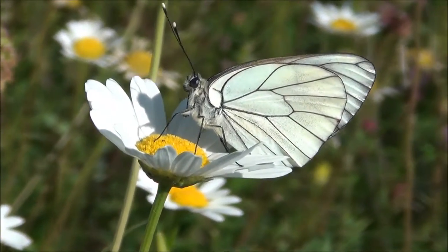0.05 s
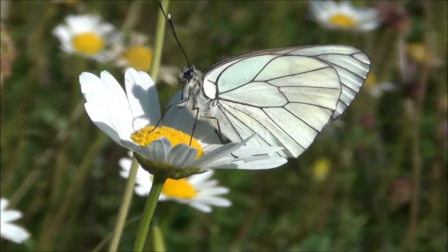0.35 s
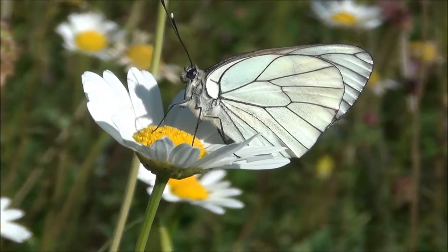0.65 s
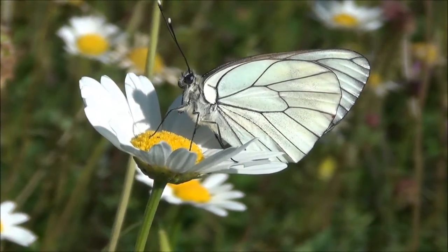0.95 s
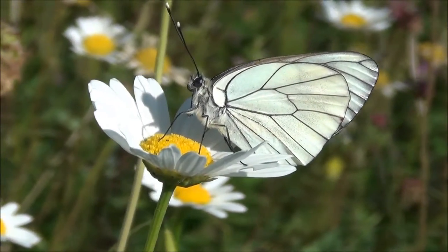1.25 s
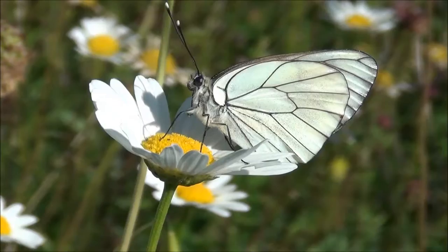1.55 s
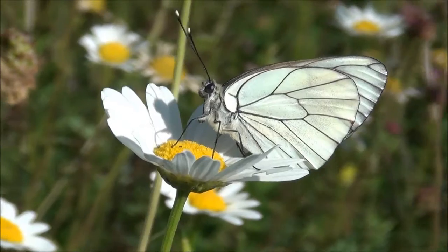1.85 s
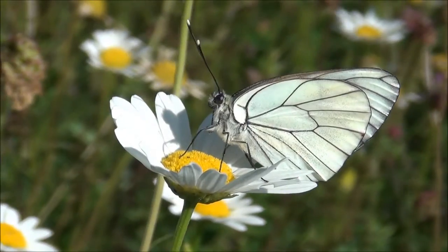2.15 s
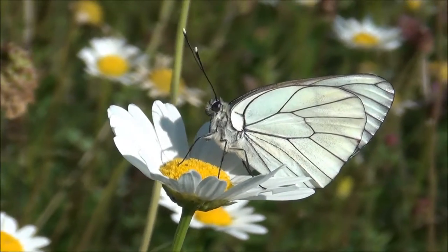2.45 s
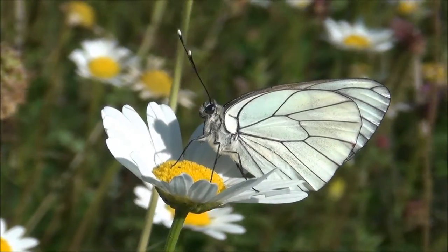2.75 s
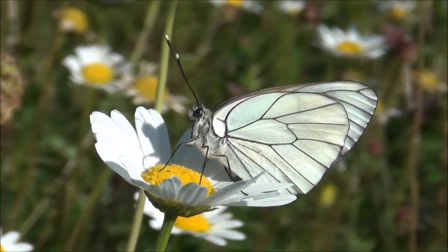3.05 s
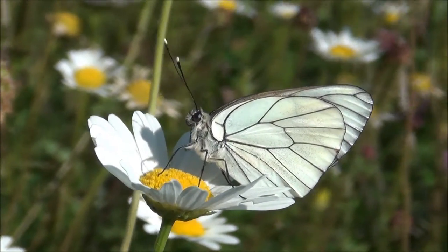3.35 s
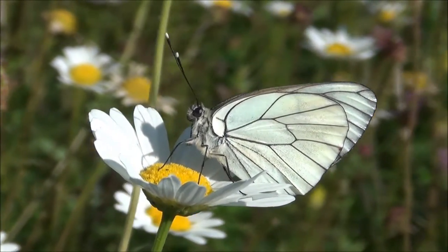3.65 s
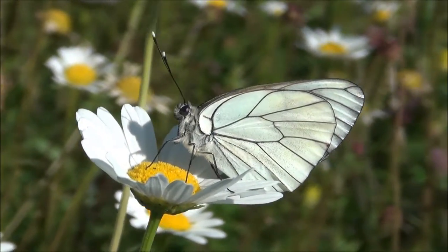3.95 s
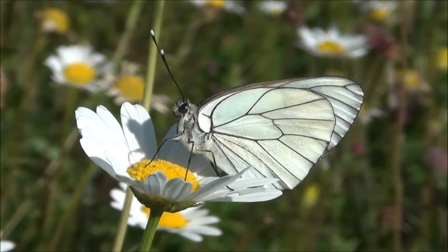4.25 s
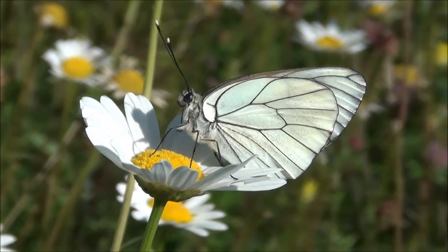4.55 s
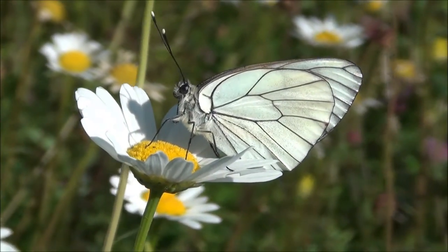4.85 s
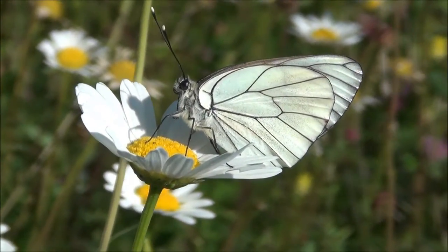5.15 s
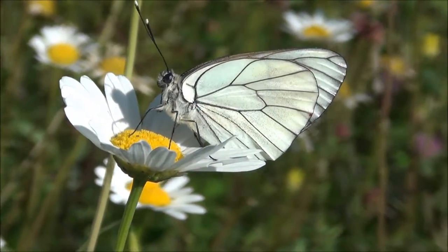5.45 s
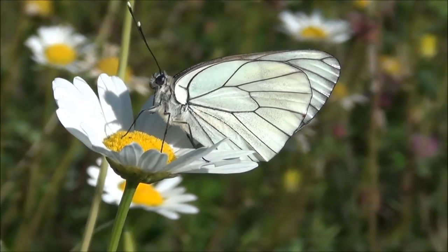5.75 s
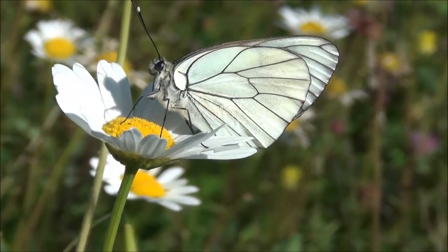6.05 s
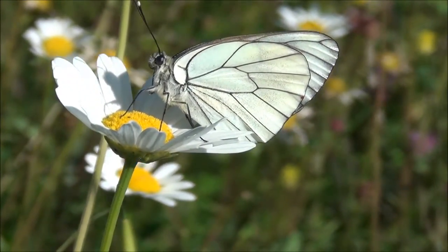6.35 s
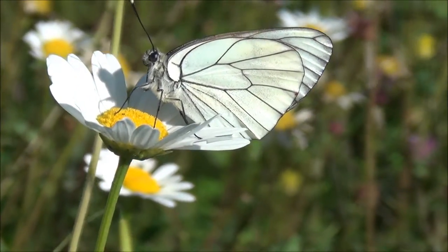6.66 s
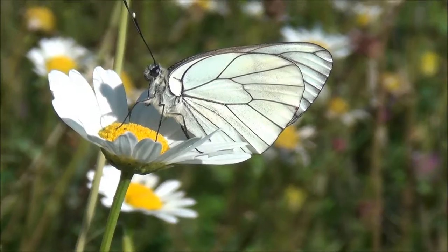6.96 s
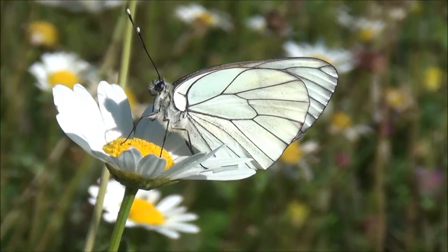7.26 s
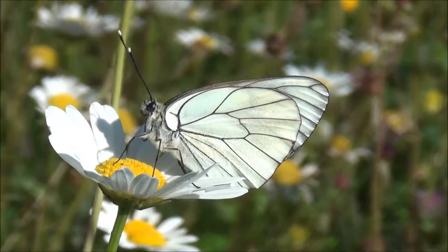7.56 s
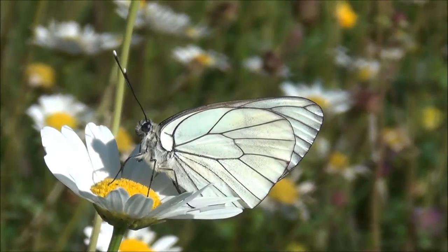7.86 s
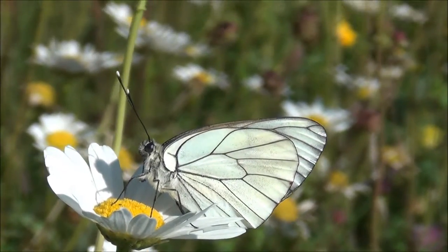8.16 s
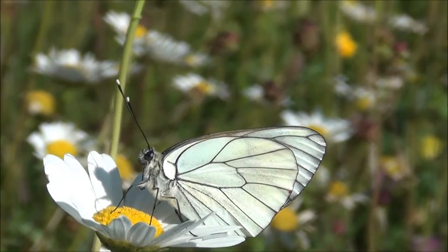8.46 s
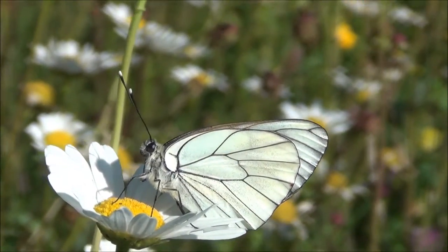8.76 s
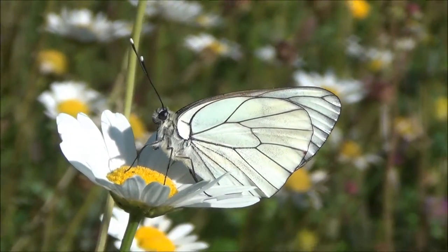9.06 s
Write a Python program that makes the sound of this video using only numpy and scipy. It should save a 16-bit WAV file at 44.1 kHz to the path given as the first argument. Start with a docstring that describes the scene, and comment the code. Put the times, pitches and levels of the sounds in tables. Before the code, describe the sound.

In a quiet meadow, one nearby cricket keeps up an even run of bright, high-pitched chirps, far louder than anything else. Behind it are a slightly lower cricket, a thin insect rasp and a distant bird whistling short falling notes. Light wind puffs on the microphone early; near the end come a few soft handling knocks and a brief brush of cloth, over a gentle outdoor hush.

```python
"""A field cricket sings close by in a sunny meadow: four wing strokes a chirp, scraper over file,
each a near-pure tone that sags as the wings slow. Farther off: a second cricket, a rasping insect
and a bird whistling mostly falling notes. Underneath: a hand-held camera's bumps and faint whine,
one sleeve rustle, a far drone, a soft breeze and the hush of open country."""
import sys
import numpy as np
from scipy import signal
from scipy.io import wavfile

SR = 44100
rng = np.random.default_rng(int(sys.argv[2]) if len(sys.argv) > 2 else 0)


def bounce(signal):
    """Save signal as a 16-bit WAV file at the path given by the first command-line argument."""
    frames = np.transpose(np.atleast_2d(signal))
    limited = np.clip(frames, -1, 1)
    pcm = np.round(limited * 32767).astype(np.int16)
    wavfile.write(sys.argv[1], SR, pcm)


N = 401310

# near cricket, nominal strokes of a chirp:
# delay/s, length/s, relative level/dB, top f/Hz, sag/Hz, swing share at catch, swing share at release
NEAR_STROKES = [(0, .0128, 0, 4490, 350, .55, .55), (.0281, .0169, -.65, 4603, 430, .3, .38),
                (.0616, .0196, .2, 4638, 470, .28, .38), (.1001, .0168, .45, 4640, 250, .28, .7)]
# its chirps: t/s, stretch of stroke spacing, first-stroke gain/dB
NEAR_CHIRPS = [(0.0602, 0.962, -8.6), (0.3855, 0.992, -6.6), (0.7034, 1.004, -7.9), (1.0448, 0.993, -6.8),
               (1.3611, 0.998, -8.6), (1.7099, 0.989, -6.3), (2.0834, 1.029, -4.9), (2.4918, 0.997, -8.4),
               (2.8297, 0.986, -6.8), (3.1972, 1.054, -8.2), (3.7366, 1.01, -8.2), (4.1092, 0.996, -7.8),
               (4.4394, 1.0, -5.1), (4.8104, 0.983, -8.0), (5.1309, 1.025, -8.1), (5.4989, 0.972, -5.4),
               (5.8079, 0.995, -7.9), (6.1359, 0.996, -4.9), (6.494, 0.978, -5.1), (6.8292, 0.999, -7.8),
               (7.2495, 0.959, -7.5), (7.5683, 1.031, -8.0), (7.9278, 0.997, -5.9), (8.3007, 1.017, -8.2),
               (8.65, 1.004, -6.2), (8.9869, 1.033, -4.7)]
# its level and bearing as the camera turns: t/s, level/dB, left-right/dB
NEAR_BEARING = [(0, -2.7, 3.5), (.9, -2.3, 3.2), (2.2, -3.2, 2.85), (4.6, -3.3, 2.8), (5.6, -4.8, 2.1),
                (7.3, -5.35, 1.85), (9.1, -4.9, 2.0)]
# second cricket's chirps: t/s, level/dB
SECOND_CHIRPS = [(0.68, -34.5), (1.52, -33), (1.837, -33), (2.205, -33), (2.639, -33), (3.297, -33),
                 (3.613, -33.5), (4.018, -35), (4.322, -34), (4.738, -34.5), (6.125, -32), (6.441, -35),
                 (6.8, -33.5), (7.148, -34), (7.483, -34), (7.827, -34), (8.202, -35), (8.58, -34.5),
                 (8.959, -33.5)]
# its strokes: delay/s, length/s, top f/Hz
SECOND_STROKES = [(0, 0.021, 4263), (0.033, 0.03, 4330), (0.077, .024, 4375)]
# insect rasps: strongest stroke t/s, relative level/dB of low resonance, of high resonance
RASP_CALLS = [(0.558, -55, -52), (.949, -50, -49), (1.312, -57, -54), (1.675, -50, -49), (2.002, -55, -51),
              (2.44, -59, -53), (2.84, -57, -52), (3.408, -53, -52), (4.337, -50, -51), (6.058, -52, -53.5),
              (6.442, -50, -53), (6.772, -53, -50), (7.079, -48.5, -54), (7.414, -46, -54),
              (7.729, -48, -53), (8.128, -51, -50.5), (8.545, -47, -51.5), (8.909, -45.5, -51)]
# strokes of a rasp: delay/s, gain/dB
RASP_PATTERN = [(-.08, -7), (-.04, -2.5), (0, 0), (.04, -6)]
# bird slurs: t/s, length/s, first f/Hz, last f/Hz, hook (1 even, more flattens out), relative level/dB
BIRD_NOTES = [(0.557, 0.073, 2256, 2340, 0.46, -44), (.97, .04, 2900, 2420, 1, -47),
              (1.881, 0.15, 2880, 1890, 2.8, -48), (2.116, 0.13, 3340, 2740, 1.04, -43.5),
              (2.277, 0.1, 3300, 2850, 1.9, -43), (2.42, .04, 2420, 2520, 1, -44.5),
              (2.467, 0.066, 2640, 2230, 2, -44.5), (2.628, 0.1, 3550, 3240, 4.2, -44.5),
              (2.873, 0.093, 3300, 2700, 0.8, -44), (2.974, 0.079, 2730, 2145, 1.6, -42.5),
              (3.15, 0.064, 4020, 3860, 3, -44), (3.428, 0.12, 3900, 3040, 5, -45),
              (3.615, 0.088, 3900, 2650, 5.3, -47), (3.81, 0.12, 3050, 2960, 1.9, -47),
              (3.995, 0.079, 4100, 3000, 0.92, -46.5), (4.066, 0.073, 2590, 2390, 1.6, -45),
              (4.245, 0.074, 3900, 3130, 2.6, -47.5), (4.424, 0.056, 2380, 2160, 1.1, -44.5),
              (4.73, 0.17, 2110, 1870, 4.1, -51), (4.97, 0.075, 1850, 1700, 1.9, -49),
              (8.345, 0.12, 3230, 2990, 4, -46), (8.77, .08, 3600, 3270, 3.5, -50),
              (8.912, 0.12, 3080, 2880, 4, -49)]
# sleeve brushes: centre t/s, length/s, level/dB
SLEEVE_BURSTS = [(8.232, 0.016, -40), (8.245, 0.014, -30.5), (8.248, 0.14, -44.5), (8.276, 0.0076, -34)]
# bumps on the camera: t/s, impulse level/dB
CAMERA_BUMPS = [(6.818, -42.5), (7.204, -39.5), (7.5, -44), (8.04, -44), (8.286, -42.5)]
# camera body modes: f/Hz, gain/dB, t60/s
BODY_MODES = [(393, -5, 0.044), (456, 7, 0.029), (650, -3, 0.022)]
# far drone: t/s, hum level/dB, swell level/dB
DRONE_LEVELS = [(0, -63, -64), (2.8, -64.5, -71.5), (3.7, -64.5, -51), (4.8, -61.5, -60), (7, -64, -70),
                (8.2, -59.5, -58), (9.1, -56, -55)]
# steady breeze: t/s, level/dB
BREEZE_LEVELS = [(0, -52.5), (1.3, -53.5), (2.5, -52.5), (3.6, -55), (5, -56), (7, -57), (9.1, -54)]
# puffs on the microphone: centre t/s, length/s, level/dB
WIND_PUFFS = [(0.137, 0.061, -43.5), (0.286, 0.12, -53), (.44, 0.051, -52), (0.59, .22, -47.5),
              (0.987, 0.056, -51), (1.534, .16, -46), (2.876, 0.34, -56), (4.18, .1, -55)]
# noise spectra: f/Hz, relative density/dB
SLEEVE_SPECTRUM = [(200, -10), (700, -5), (1300, 0), (2200, 8), (4000, 5), (7500, 0), (10000, -19),
                   (16000, -33)]
BREEZE_SPECTRUM = [(20, -17), (35, -16.5), (55, -3.5), (90, -2.5), (140, -2), (220, -7), (400, -42.5),
                   (1000, -57.5)]
HUSH_SPECTRUM = [(60, -27.5), (150, -3.5), (220, 4), (300, -0.5), (600, 1), (950, 2), (1400, -6.5),
                 (2200, -14.5), (5000, -23)]
HISS_SPECTRUM = [(300, -21), (1200, 2.5), (2200, 3.5), (3200, 1), (4400, 3.5), (6000, -1), (8000, -1),
                 (10000, -2.5), (12000, -4), (15500, -3)]
# stereo likeness of the air: f/Hz, left-right correlation
AIR_CORRELATION = [(25, .98), (60, 0.9), (130, 1), (300, 0.61), (700, 0.24), (1400, .3), (3000, 0.33),
                   (7000, 0.62), (13000, 0.92)]

CATCH_S, SETTLE_S, RING_T60_S, WING_HZ = .0011, .00027, .014, 4027
CREST_SHARE, TOP_SHARE = .59, .18   # places of peak swing and peak pitch in a stroke


def near_cricket():
    """Closing strokes sing with weak overtones and some scrape; between them the wings brush open."""
    tone, overtones, friction, opening = np.zeros(N), np.zeros((2, N)), np.zeros(N), np.zeros(N)
    for s, length_s, db, top_hz, shape in near_strokes():
        swing, grip, phase = wing_stroke(length_s, top_hz, *shape, uneven=.018)
        swing = swing * from_db(db)
        add(tone, s - CATCH_S, swing * np.sin(phase))
        second = from_db(-24) * panned(-1.2) * np.sin(2 * phase + [[.55], [0]])
        third = from_db(-54) * np.sin(3 * phase)
        # tooth overtones grow more slowly than the swing
        add(overtones, s - CATCH_S, np.abs(swing) ** .7 * grip ** .3 * (second + third))
        scrape_gain, catch_gain, opening_gain = from_db(rng.uniform(-6, 4, 3) + [-47, -44, -41])
        add(friction, s - CATCH_S, swing * scrape_gain)
        add(friction, s - .004, swell(.0066) * catch_gain)
        add(opening, s + length_s - .003, swell(.035) * opening_gain)
    rough = resonant_noise(5220, 2000) + .92 * resonant_noise(8740, 3900)
    brush = opening * (resonant_noise(4220, 660) + from_db(-8) * rough)
    _, pan_db = in_time(NEAR_BEARING)
    direct = tone * panned(pan_db) + overtones + friction * rough + brush
    stems = scatter(direct, t60_s=.09, level_db=-29.5)
    field = scatter(direct, t60_s=.22, level_db=-41)
    return direct + stems + field


def near_strokes():
    """Four strokes a chirp, the first soft, each slightly varied in length and pitch."""
    times_s, levels_db, _ = np.transpose(NEAR_BEARING)
    for s, stretch, first_db in NEAR_CHIRPS:
        for k, (delay_s, length_s, db, top_hz, *shape) in enumerate(NEAR_STROKES):
            longer, higher = 1 + rng.normal(0, [.025, .002])
            db = db + np.interp(s, times_s, levels_db) + (first_db if k == 0 else 0)
            yield s + stretch * delay_s, length_s * longer, db, top_hz * higher, shape


def wing_stroke(length_s, top_hz, sag_hz, catch, release, uneven, jitter=.003):
    """The scraper runs down the file, one tooth a cycle; released, the wing rings at its own note."""
    t = np.arange(-CATCH_S, length_s + RING_T60_S, 1 / SR)
    share, free_s = np.clip(t / length_s, 0, 1), np.maximum(t - length_s, 0)
    grip = np.exp(-free_s / SETTLE_S)
    onset = catch * np.minimum(1 + t / CATCH_S, 1)
    build = (1 - catch) * np.sin(np.pi / 2 * np.minimum(share / CREST_SHARE, 1))
    fade = 1 - (1 - release) * np.maximum((share - CREST_SHARE) / (1 - CREST_SHARE), 0) ** 1.5
    ring = (1 - .28 * (1 - grip)) * from_db(-60 * free_s / RING_T60_S)   # release checks the swing
    swing = (onset + build) * fade * ring * (1 + uneven * wobble(len(t), hz=1500))
    teeth_hz = top_hz - sag_hz * np.abs((share - TOP_SHARE) / (1 - TOP_SHARE)) ** 2.24
    hz = (WING_HZ + grip * (teeth_hz - WING_HZ)) * (1 + jitter * wobble(len(t), hz=1800))
    return swing, grip, 2 * np.pi * np.cumsum(hz) / SR


def second_cricket():
    """A lower voice some metres off, with more meadow scatter."""
    out = np.zeros(N)
    for s, db in SECOND_CHIRPS:
        for delay_s, length_s, top_hz in SECOND_STROKES:
            swing, grip, phase = wing_stroke(length_s, top_hz, sag_hz=270,
                                             catch=.12, release=.25, uneven=.097)
            wave = np.sin(phase) + from_db(-20.5) * np.sin(2 * phase)
            add(out, s + delay_s - CATCH_S, from_db(db) * np.sqrt(np.abs(swing)) * grip * wave)
    return out * panned(.5) + scatter(out, t60_s=.1, level_db=-12)


def rasping_insect(stroke_s=.018):
    """Short toneless strokes excite two wing resonances."""
    low, high = np.zeros(N), np.zeros(N)
    for s, low_db, high_db in RASP_CALLS:
        for delay_s, db in RASP_PATTERN:
            start_s = s + delay_s - stroke_s / 2
            add(low, start_s, swell(stroke_s) * from_db(low_db + db))
            add(high, start_s, swell(stroke_s) * from_db(high_db + db))
    rasp = low * resonant_noise(6030, 650) + high * resonant_noise(9940, 2000)
    return from_db(2.5) * rasp * panned(-.4)


def bird():
    """Pure whistles, mostly falling, blurred by distance."""
    out = np.zeros(N)
    for s, length_s, first_hz, last_hz, hook, db in BIRD_NOTES:
        share = np.linspace(0, 1, int(length_s * SR))
        slur_hz = last_hz + (first_hz - last_hz) * (1 - share) ** hook
        hz = slur_hz * (1 + .013 * wobble(len(share), hz=130))
        envelope = from_db(db) * np.sqrt(np.abs(np.sin(np.pi * share)))
        add(out, s, envelope * np.sin(2 * np.pi * np.cumsum(hz) / SR))
    return from_db(-4.5) * (out * panned(-.5) + scatter(out, t60_s=.14, level_db=-2))


def sleeve_rustle():
    """Cloth brushes in short, grainy bursts."""
    grain = from_db(3 * wobble(N, hz=700))
    return bursts(SLEEVE_BURSTS) * grain * coloured_noise(SLEEVE_SPECTRUM, flutter_db=1.5)


def camera_bumps():
    """Soft knocks ring the body's modes."""
    knocks, rings = np.zeros(N), np.zeros(N)
    for s, db in CAMERA_BUMPS:
        add(knocks, s, from_db([db]))
    for hz, db, t60_s in BODY_MODES:
        r, w = from_db(-60 / (t60_s * SR)), 2 * np.pi * hz / SR
        b, a = [0, np.sin(w)], [1, -2 * r * np.cos(w), r * r]
        rings += from_db(db) * signal.lfilter(b, a, knocks + 1e-18)
    return rings


def camera_whine(whine_hz=15625, throb_hz=50):
    """A thin, throbbing electronic tone."""
    t = np.arange(N) / SR
    throb = 1 + .9 * np.cos(2 * np.pi * throb_hz * t)
    return from_db(-63) * throb * np.sin(2 * np.pi * whine_hz * t)


def drone():
    """A faint hum of two wavering notes; a broader resonance swells and fades."""
    hum_db, swell_db = in_time(DRONE_LEVELS)
    hum = resonant_noise(371.4, 45) + from_db(-1) * resonant_noise(913, 70)
    broad = np.array([resonant_noise(970, 380) for ear in range(2)])
    return from_db(hum_db) * hum + from_db(swell_db) * broad


def breeze():
    """Wind rumbles on the microphone, with a few puffs."""
    wind = from_db(in_time(BREEZE_LEVELS)[0] + 1.6 * wobble(N, hz=11))
    return (wind + bursts(WIND_PUFFS)) * coloured_noise(BREEZE_SPECTRUM, flutter_db=2.5)


def meadow():
    """Far hush, fine hiss and countless distant crickets merged into one band."""
    hush = from_db(-48.5) * coloured_noise(HUSH_SPECTRUM, flutter_db=1) * panned(-1.1)
    hiss = from_db(-48.5) * coloured_noise(HISS_SPECTRUM, flutter_db=.6)
    chorus = from_db(-60.5) * np.array([resonant_noise(4400, 550) for ear in range(2)])
    return hush + hiss + chorus


def scatter(x, t60_s, level_db):
    """Stems and ground return a short dense tail, different at each ear."""
    t = np.arange(int(.3 * SR)) / SR
    tail = rng.standard_normal((2, len(t))) * from_db(-60 * t / t60_s) * (t > .002)
    tail /= np.sqrt(np.sum(tail ** 2, axis=1, keepdims=True))
    return from_db(level_db) * signal.fftconvolve(np.atleast_2d(x), tail, axes=1)[:, :N]


def resonant_noise(hz, width_hz):
    """Noise twice through one resonance; rms 1."""
    r = np.exp(-np.pi * width_hz / SR)
    b, a = [1 - r, 0, r - 1], [1, -2 * r * np.cos(2 * np.pi * hz / SR), r * r]
    return rms_one(signal.lfilter(b, a, signal.lfilter(b, a, rng.standard_normal(N))))


def coloured_noise(spectrum, flutter_db):
    """Stereo noise bands, each with its own level, flutter and correlation; rms 1."""
    edges_hz = np.geomspace(spectrum[0][0], min(spectrum[-1][0] * 1.1, 19000), 2 * len(spectrum))
    out, white = np.zeros((2, N)), rng.standard_normal((2, 2, N))
    for k, (low_hz, high_hz) in enumerate(zip(edges_hz, edges_hz[1:])):
        band = signal.butter(2, [low_hz, high_hz], "band", fs=SR, output="sos")
        mid, side = signal.sosfilt(band, white[k % 2])
        hz = np.sqrt(low_hz * high_hz)
        alike = at_hz(AIR_CORRELATION, hz)
        gain = from_db(at_hz(spectrum, hz) + flutter_db * wobble(N, hz=19))
        out += gain * (np.sqrt(1 + alike) * mid + np.sqrt(1 - alike) * side * [[1], [-1]])
    return rms_one(out)


def wobble(count, hz):
    """Random drift, hz new values a second."""
    steps = np.arange(count) * hz / SR
    knots = rng.standard_normal(int(steps[-1]) + 2)
    return np.interp(steps, np.arange(len(knots)), knots)


def bursts(rows):
    """Envelope of centred swells."""
    envelope = np.zeros(N)
    for s, length_s, db in rows:
        add(envelope, s - length_s / 2, swell(length_s) * from_db(db))
    return envelope


def swell(length_s):
    return np.hanning(max(int(length_s * SR), 4))


def panned(pan_db):
    """Left and right gains, mean 1."""
    gains = from_db(np.array([[.5], [-.5]]) * pan_db)
    return gains / gains.mean(axis=0)


def in_time(rows):
    """Each column of a curve at every sample."""
    s, *columns = np.transpose(rows)
    return [np.interp(np.arange(N) / SR, s, c) for c in columns]


def at_hz(points, hz):
    """Interpolate on a log-frequency axis."""
    points_hz, values = np.transpose(points)
    return np.interp(np.log(hz), np.log(points_hz), values)


def add(out, s, sound):
    """Mix a sound in at time s."""
    i = int(np.clip(round(s * SR), 0, N))
    out[..., i:i + sound.shape[-1]] += sound[..., :N - i]


def from_db(db):
    return 10 ** (np.asarray(db) / 20)


def rms_one(x):
    return x / np.sqrt(np.mean(x ** 2) + 1e-20)


def scene():
    """Stereo sum of all sources."""
    animals = near_cricket() + second_cricket() + rasping_insect() + bird()
    handling = sleeve_rustle() + camera_bumps()
    return animals + handling + camera_whine() + drone() + breeze() + meadow()


def record(dry, cutoff_hz=16000):
    """Clip at full scale, then low-pass steeply."""
    lowpass = signal.ellip(12, .05, 90, cutoff_hz, fs=SR, output="sos")
    return signal.sosfilt(lowpass, np.clip(dry, -1, 1))


dry = scene()
out = record(dry)
bounce(out)
```